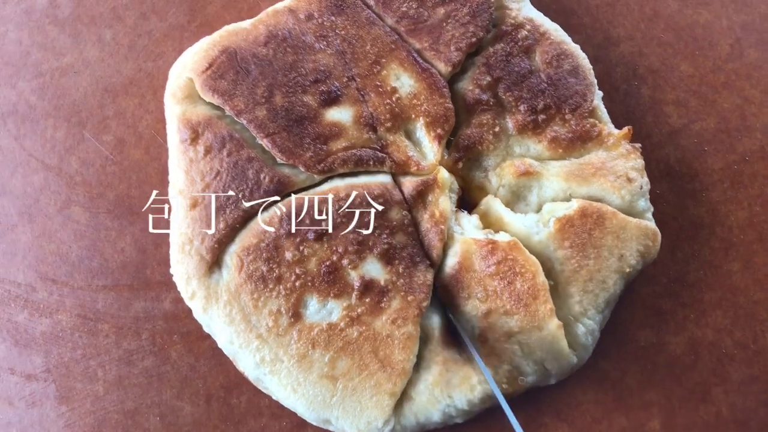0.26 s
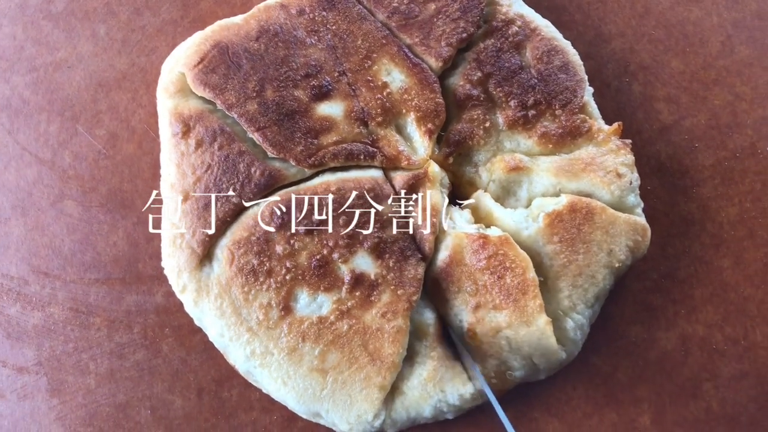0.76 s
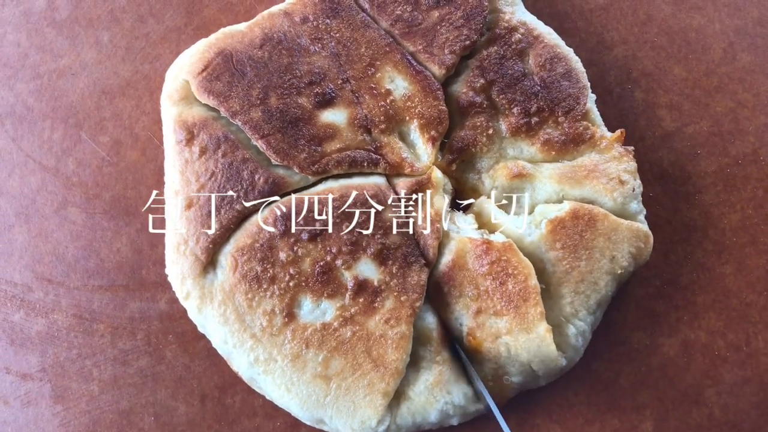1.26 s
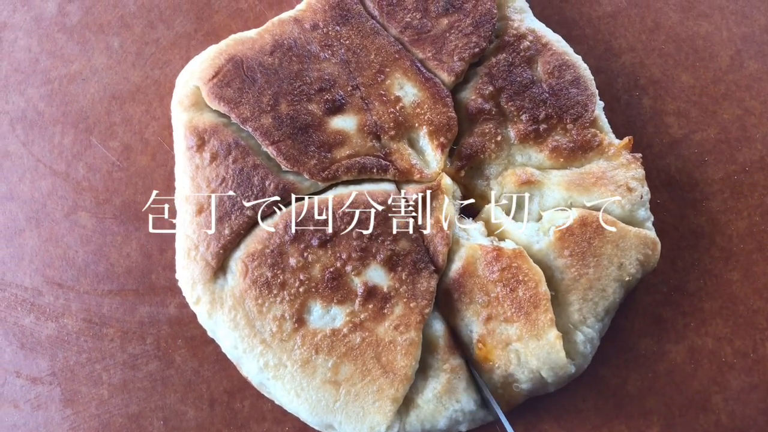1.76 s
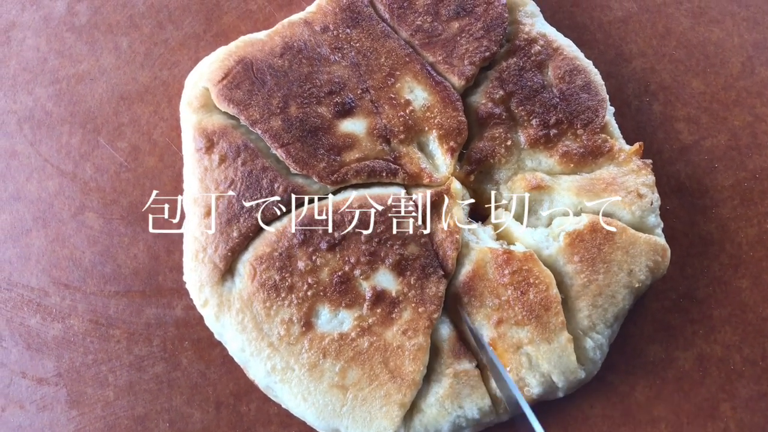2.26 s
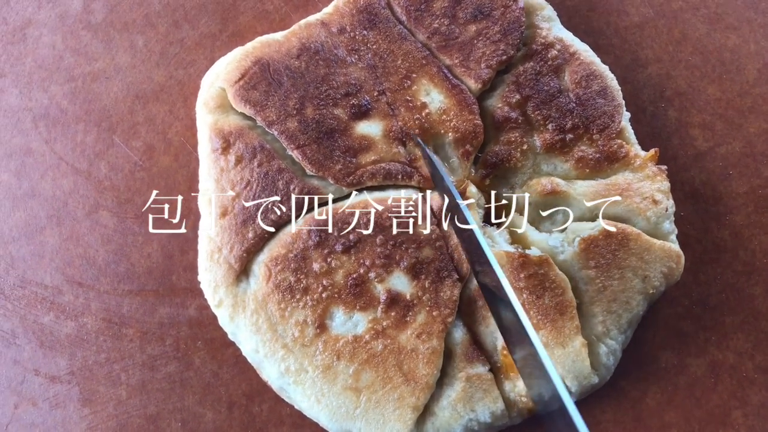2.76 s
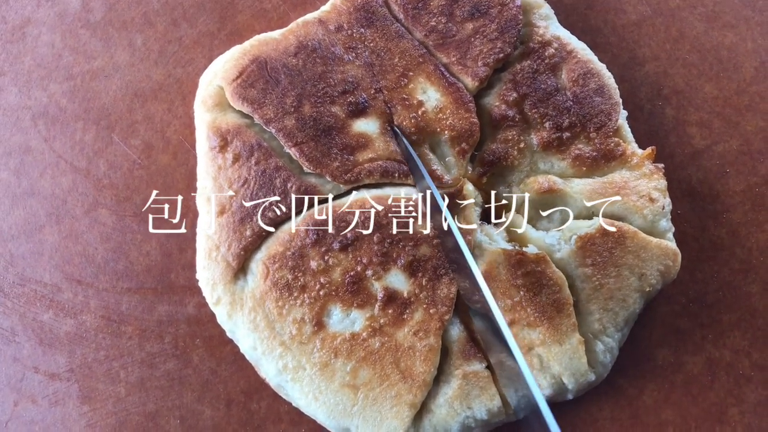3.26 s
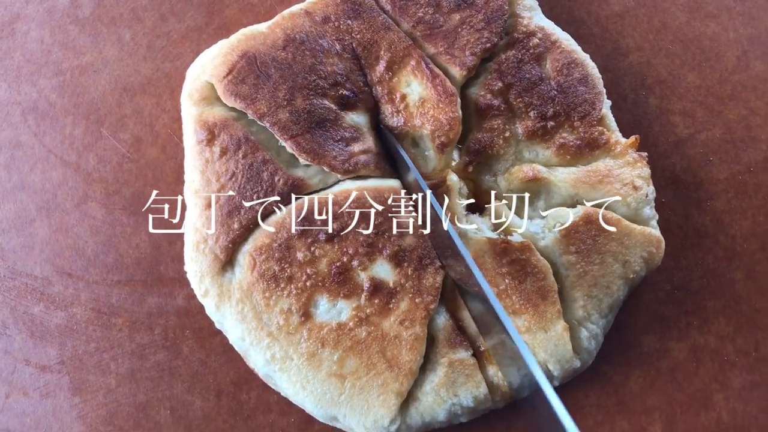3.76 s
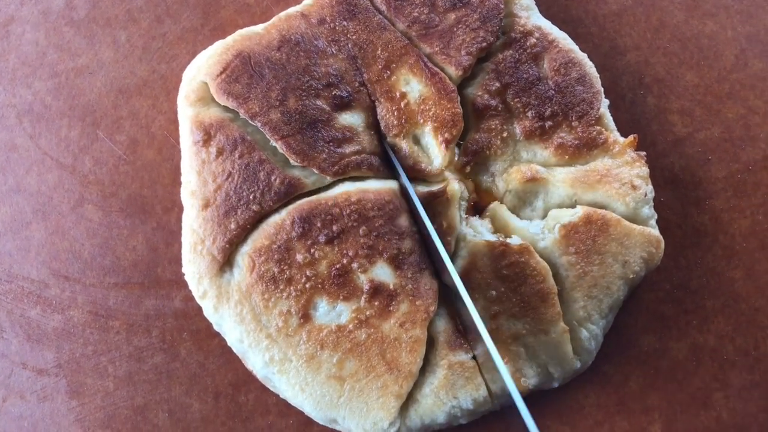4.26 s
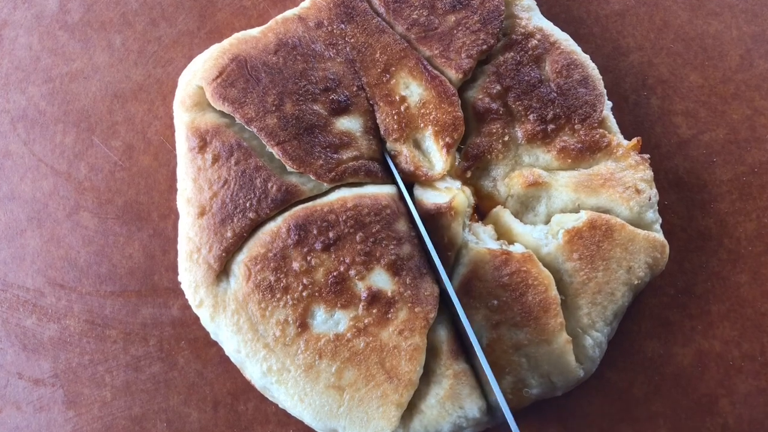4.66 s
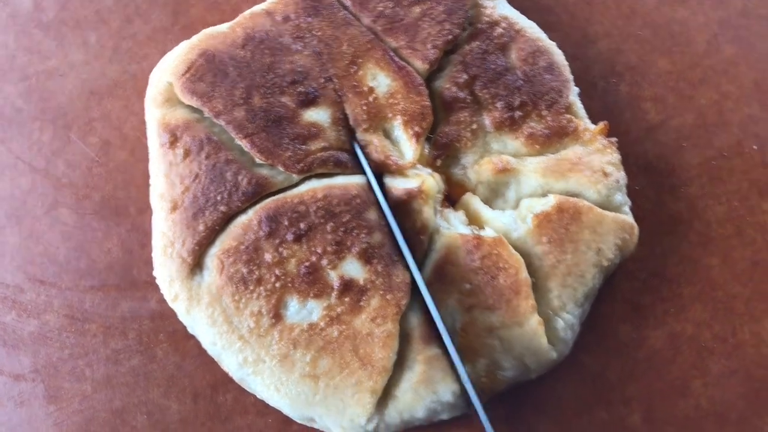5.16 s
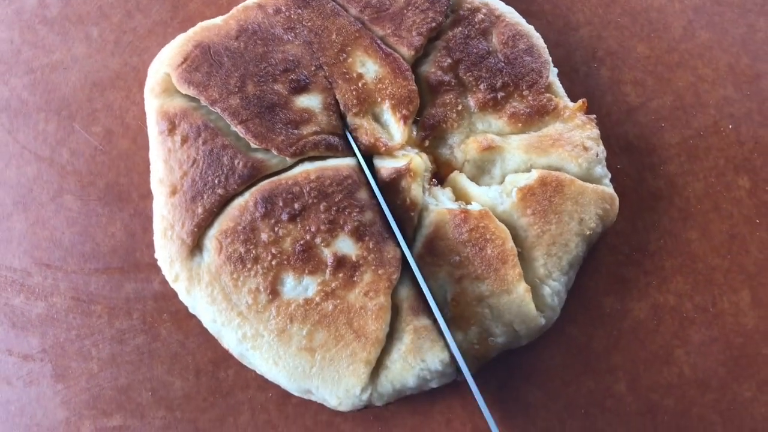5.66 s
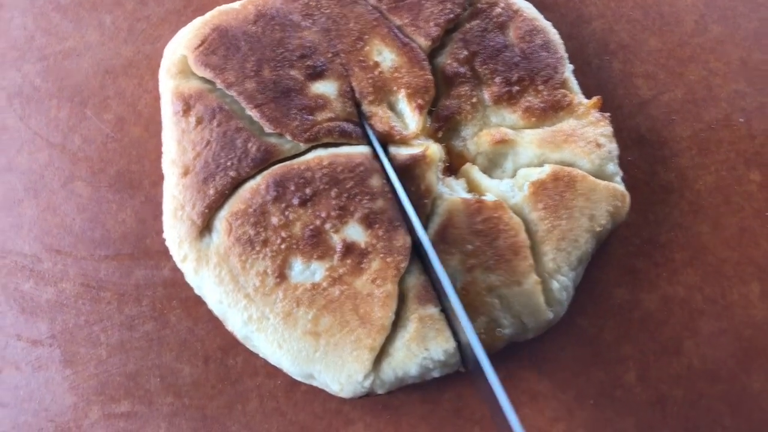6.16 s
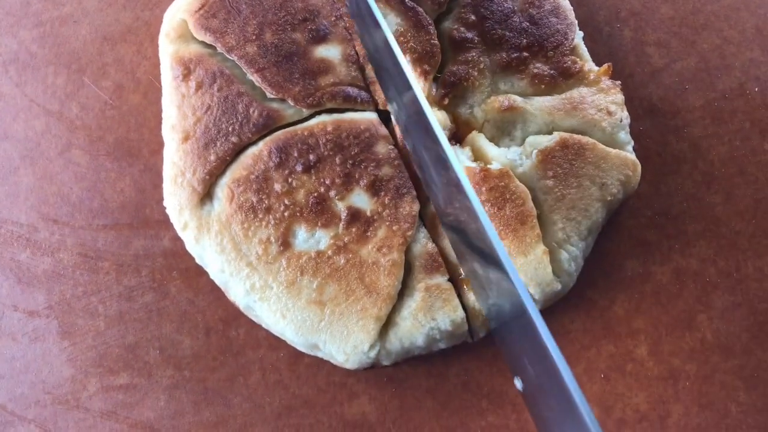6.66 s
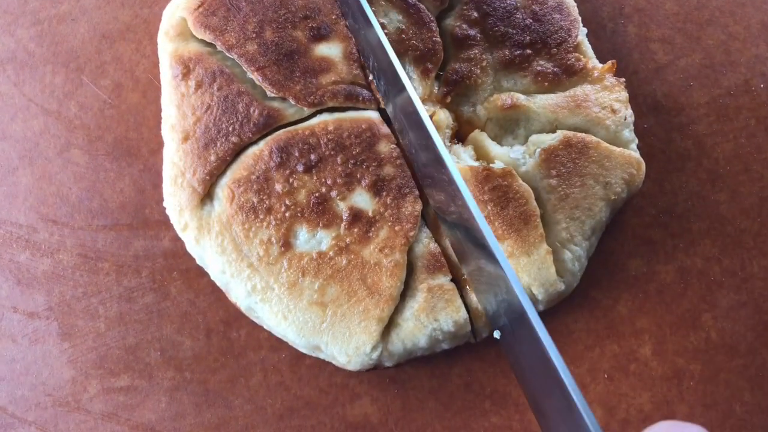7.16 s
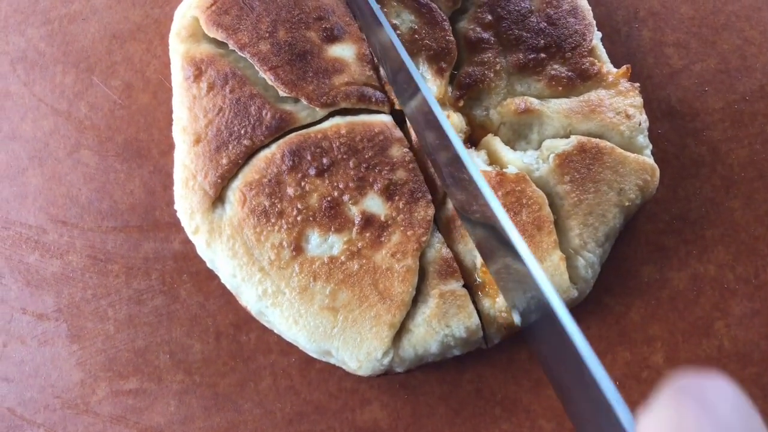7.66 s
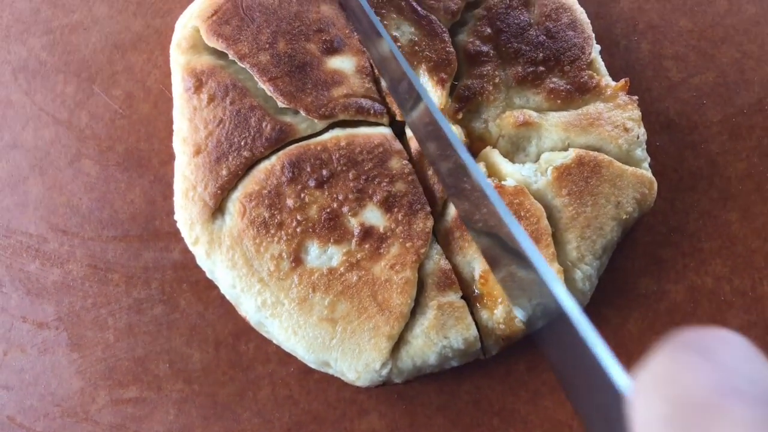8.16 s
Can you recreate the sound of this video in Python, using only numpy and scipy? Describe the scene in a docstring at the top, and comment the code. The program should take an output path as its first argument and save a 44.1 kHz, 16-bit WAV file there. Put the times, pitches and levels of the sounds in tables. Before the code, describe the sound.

A knife cuts crusty pan-fried bread on a cutting board, heard close in a quiet kitchen with a faint low rumble and appliance hum throughout. From the start to about 1.7 seconds, soft rasping strokes saw back and forth about three times a second, growing duller and quieter. Tiny moist ticks from the filling dot the first two seconds. Light, separate scrapes follow until 3.5 seconds. From 3.6 to 6 seconds the blade presses down and the crust crumbles and snaps in brittle, irregular clusters. Around 5 seconds there is a dull thud on the board and a very faint steel squeak. At 5.5 seconds the edge hits the board with one sharp knock, by far the loudest sound. A few small cracks and faint scrapes follow, then longer drags near 7.3 seconds lead into gentle, quick sawing until about 8.4 seconds.

```python
"""In a quiet kitchen, close by, a knife saws through crusty pan-fried bread on a cutting board.
Short strokes finish one cut, rasping as the edge slips over tiny snags, and the moist filling ticks.
The blade is set down again and pressed: the crust crumbles and cracks by brittle fracture, and the
steel squeaks faintly. The edge thuds, then knocks, exciting the modes of the board, and the sawing
resumes. Under it all lie a low rumble and the drone of an appliance."""
import sys
import numpy as np
from scipy import signal
from scipy.fft import rfft, irfft
from scipy.io import wavfile

SR = 44100
rng = np.random.default_rng(int(sys.argv[2]) if len(sys.argv) > 2 else 0)


def wav_record(signal):
    """Record a signal, one row per channel, as 16-bit PCM in the file named by sys.argv[1]."""
    frames = np.transpose(np.atleast_2d(signal))
    bounded = np.clip(frames, -1, 1)
    # unit amplitude maps onto the largest positive 16-bit level
    quanta = np.round(bounded * 32767).astype(np.int16)
    wavfile.write(sys.argv[1], SR, quanta)


N = 371763
TIME, HZ = np.arange(N) / SR, np.fft.rfftfreq(N, 1 / SR)
TAPS = 4096  # samples in one short pulse
TAP_TIME, TAP_HZ = np.arange(TAPS) / SR, np.fft.rfftfreq(TAPS, 1 / SR)


def amp(db):
    """Decibels as an amplitude ratio."""
    return 10 ** (np.asarray(db) / 20)


def unit_rms(x):
    """Normalisation to an rms of 1."""
    return x / np.sqrt(np.mean(x ** 2) + 1e-20)


def curve_at(points, hz):
    """Interpolation on a logarithmic frequency axis."""
    f, value = np.transpose(points)
    return np.interp(np.log(hz + 1), np.log(f + 1), value)


def add(mix, start_s, sound):
    """Superposition of a sound on a mix, in place."""
    part = mix[max(round(start_s * SR), 0):][:len(sound)]
    part += sound[:len(part)]


def noise(gain, count=N):
    """White noise filtered by a gain at each frequency, at an rms of 1."""
    return unit_rms(irfft(rfft(rng.standard_normal(count)) * gain, count))


def drift(count, hz):
    """Slow random fluctuation: noise low-passed at hz."""
    return noise(1 / (1 + (np.fft.rfftfreq(count, 1 / SR) / hz) ** 4), count)


def lift(resonances):
    """Resonance: each row adds a bell-shaped peak, in dB, to a spectrum."""
    return sum(db / (1 + (2 * (TAP_HZ - hz) / width) ** 2) for hz, width, db in resonances)


def pulse(db, bass_delay_s=0, bend_hz=70):
    """A causal pulse of given spectrum; dispersion of bending waves in the board can delay its bass."""
    log_gain = np.log(amp(np.maximum(db, db.max() - 100)))
    mirrored = np.r_[log_gain, log_gain[-2:0:-1]]
    minimum_phase = np.conj(signal.hilbert(mirrored))[:len(db)]
    lag = 2 * np.pi * bass_delay_s * bend_hz * np.log(1 + TAP_HZ / bend_hz)
    return irfft(np.exp(minimum_phase - 1j * lag))


def grains(count, per_s, spread_db):
    """Shot noise: impulses at random times, mostly small and a few large."""
    chance, size, sign = rng.random((count, 3)).T
    size_db = spread_db * np.minimum(-np.log(1 - size), 4)
    return unit_rms((chance < per_s / SR) * amp(size_db) * np.sign(sign - .5))


# The room's noise spectrum. Each row: frequency in Hz, relative density in dB.
ROOM_NOISE = [(13, -47.5), (22, -20), (70, -3.5), (106, -11.5), (155, -5.5), (228, -8.5), (262, -3),
              (300, -13), (335, -11), (407, -15), (467, -15.5), (1040, -22), (1220, -26), (2640, -29.5),
              (15800, -30.5)]
# The drone of an appliance. Each row: centre in Hz, bandwidth in Hz, level in dB.
DRONE_BANDS = [(67, 45, -78), (250, 11, -80), (330.7, 6.6, -83.5)]


def background(air_db=-66.5):
    """Broadband noise gives rumble and hiss; narrowband noise beats within itself as a wavering drone."""
    air = amp(air_db) * noise(amp(curve_at(ROOM_NOISE, HZ)))
    drone = sum(amp(db) * noise(1 / (1 + (2 * (HZ - hz) / width) ** 2)) for hz, width, db in DRONE_BANDS)
    return air + drone


# Bouts of sawing. Each row: start and end in seconds, period in seconds, share of it spent pushing,
# first level in dB, fade in dB per second, pull relative to push in dB, first tilt in dB per octave.
BOUTS = [(-0.008, 1.66, .296, .44, -54.5, -8, -6.5, .5), (7.654, 8.45, .25, .48, -60, -2, -1.5, 0.6)]


def strokes(turn_s=0.024, pull_tilt=1.1, tilt_per_s=-1.85):
    """Reciprocating motion: push, rest, brighter pull, rest; both strokes dull as the blade sinks."""
    rows = []
    for first, last, period, push_share, first_db, fade, pull_db, first_tilt in BOUTS:
        push_s = period * push_share
        for start in np.arange(first, last, period):
            db = first_db + fade * (start - first)
            tilt = first_tilt + tilt_per_s * (start - first)
            rows.append((start, push_s - turn_s, db, tilt))
            rows.append((start + push_s, period - push_s - turn_s, db + pull_db, tilt + pull_tilt))
    return rows


# Single drags as the blade is freed, set down or started.
# Each row: start in seconds, length in seconds, level in dB, tilt in dB per octave.
DRAGS = [(1.76, 0.051, -65.5, -2.5), (1.867, 0.041, -67, -3.5), (1.999, 0.053, -73, 1),
         (2.112, 0.019, -59.5, 3), (2.181, 0.037, -70.5, 0.5), (2.701, 0.056, -61.5, 0.8),
         (2.771, 0.066, -63, 1.5), (2.945, 0.019, -67, 3), (3.101, 0.011, -58, 0.5),
         (3.193, 0.34, -75.5, -1.5), (5.398, 0.083, -50, -0.2), (6.241, 0.05, -69.5, -2),
         (6.821, 0.025, -69, 1.1), (7.07, .01, -59.5, 6.5), (7.165, 0.045, -68, 1.3),
         (7.304, 0.17, -62.5, 1.5), (7.505, 0.11, -58.5, 2.5)]
# The rasp in dough, and on crust and board. Each row: frequency in Hz, relative density in dB.
RASP_IN_DOUGH = [(110, -41), (180, -5), (322, 0.5), (564, -11), (971, 0), (1330, -7.5), (1670, -4.5),
                 (2010, -8.5), (2720, -10.5), (3220, -6.5), (4340, -10), (5330, -7), (8360, -12),
                 (14400, -13), (15800, -14.5)]
RASP_ON_CRUST = [(150, -23.5), (250, -10), (342, -1), (546, -5.5), (857, -0.5), (2000, -3.5), (4000, -8),
                 (9000, -13.5), (15800, -13.5)]
# Resonances of the free steel. Each row: frequency in Hz, bandwidth in Hz, lift in dB.
BLADE_MODES = [(1530, 76, 1), (2820, 170, 3.5), (3780, 170, 2.5), (5070, 500, 1.5), (6040, 200, 2.5),
               (7664, 220, 4), (12000, 350, 4), (13170, 400, 4), (14460, 250, 2.5), (15550, 250, 3.5)]
# The steel rings less once dough grips it. Each row: time in seconds, factor on the lift of its modes.
BLADE_FREEDOM = [(2.8, 1.8), (7.3, 1.15)]


def sawing(new_cut_s=2.5, rise_share=0.2, fall_share=0.29, flutter_db=2.14, gain_db=1):
    """Sliding friction: the edge slips over countless snags, and the rasp swells with its speed."""
    out = np.zeros(N)
    for start, length, db, tilt in strokes() + list(DRAGS):
        t = np.arange(0, length, 1 / SR)
        if start < new_cut_s:
            colour = curve_at(RASP_IN_DOUGH, TAP_HZ)
        else:
            freedom = np.interp(start, *np.transpose(BLADE_FREEDOM))
            colour = curve_at(RASP_ON_CRUST, TAP_HZ) + freedom * lift(BLADE_MODES)
        colour += tilt * np.log2(np.clip(TAP_HZ, 900, 12000))
        snags = grains(len(t), per_s=16000, spread_db=2.5)
        rasp = unit_rms(signal.fftconvolve(snags, pulse(colour))[:len(t)])
        speed = np.minimum(t / (rise_share * length), 1)
        speed *= np.minimum((length - t) / (fall_share * length), 1)
        gain = amp(db + gain_db + flutter_db * drift(len(t), hz=70))
        add(out, start, gain * rasp * speed / speed.max())
    return out


# Moist dough letting go of the steel. Each row: start in seconds, envelope peak in dB, pitch in Hz.
TICKS = [(0.2841, -40.5, 5900), (0.8674, -44, 12700), (0.9884, -37.5, 12200), (1.418, -38, 11900),
         (1.4455, -41.5, 6900), (1.4997, -46, 7100), (1.5227, -40.5, 7800), (1.5796, -40, 12400),
         (1.7522, -40.5, 10600), (1.8024, -41, 7020), (1.8568, -40.5, 10800), (2.0033, -40, 6640),
         (2.1071, -36.5, 6500), (2.1211, -38.5, 3930), (2.1268, -47, 9900), (3.4204, -43, 14600),
         (4.5114, -41.5, 4800)]


def ticking(decay_cycles=1.03, second_db=-13, second_s=0.0079):
    """Film rupture: a wet film bursts and rings briefly, then the rest of it lets go more weakly."""
    out = np.zeros(N)
    for start, db, hz in TICKS:
        age = TAP_TIME * hz / decay_cycles
        envelope = 2 * age * np.exp(1 - 2 * age)
        tick = amp(db) * envelope * np.sin(2 * np.pi * hz * TAP_TIME)
        add(out, start, tick)
        add(out, start + second_s * rng.uniform(0.55, 1.4), amp(second_db) * tick)
    return out


# Waves returning from the rim of the board. Each row: delay in seconds, gain in dB.
RIM_ECHOES = [(.0034, -15), (0.0119, -12.5)]
# Modes of board and blade. Each row: frequency in Hz, dB over the direct blow, 60 dB decay in seconds.
BOARD_MODES = [(136, 3, 0.13), (298, 7, 0.2), (458, -1.5, .2), (630, 0.5, 0.37), (866, -5, .2),
               (1035, 3, 0.066), (1190, -3, 0.26), (1336, -10, 0.19), (1572, -6.5, .17), (1780, -5.5, .2),
               (2429, 0.5, 0.16), (2650, -0.5, 0.2), (3190, 2, 0.25)]
# Broad resonances of a blow on wood. Each row: frequency in Hz, bandwidth in Hz, lift in dB.
WOOD_RESONANCES = [(248, 140, 2), (1420, 270, 7.5), (2885, 1000, 5)]
# The edge meets the board. Each row: start in seconds, peak of the direct blow in dB,
# treble corner in Hz (higher is harder), bass corner in Hz (higher is lighter).
KNOCKS = [(1.218, -57, 1000, 600), (1.236, -46, 850, 250), (1.25, -49.5, 610, 70), (3.738, -52.5, 160, 70),
          (3.872, -52.5, 161, 70), (4.7307, -45.5, 1300, 250), (4.972, -32.5, 1110, 1400),
          (4.9745, -30, 195, 70), (5.121, -50, 200, 90), (5.4789, -11, 1670, 94.7), (5.952, -49, 600, 100),
          (7.072, -55, 790, 1200), (8.201, -48, 1000, 150)]


def knocking(rolloff_order=2.32, click_db=-29):
    """Impact: a blow disperses into a falling chirp, echoes and excites modes; soft ones lack treble."""
    out, t = np.zeros(N), np.arange(SR // 2) / SR
    board = np.zeros(len(t))
    for delay, echo_db in [(0, 0), *RIM_ECHOES]:
        add(board, delay, amp([echo_db]))
    for hz, mode_db, t60 in BOARD_MODES:
        damping = np.log(1000) / t60
        board += amp(mode_db) * 2 * damping / SR * np.exp(-damping * t) * np.cos(2 * np.pi * hz * t)
    for start, db, treble_hz, bass_hz in KNOCKS:
        click = amp(click_db) * (treble_hz / 1750) ** 2
        force = 1 / np.sqrt(1 + (TAP_HZ / treble_hz) ** (2 * rolloff_order)) + click
        radiated = force * (TAP_HZ + 1) / np.hypot(TAP_HZ, bass_hz)
        radiated *= (TAP_HZ + 1) / np.hypot(TAP_HZ, 50)  # the board is too small to radiate deep bass
        blow = pulse(20 * np.log10(radiated) + lift(WOOD_RESONANCES), bass_delay_s=0.027)
        add(out, start, amp(db) * signal.fftconvolve(blow / abs(blow).max(), board))
    return out


# Shoves on the blade. Each row: start in seconds, end in seconds, level of the crumbling in dB.
SHOVES = [(3.622, 4.112, -68.5), (3.703, 3.788, -56.5), (4.27, 4.34, -66), (4.49, 4.67, -66),
          (4.7, 4.97, -62), (5.096, 5.24, -58.5), (5.314, 5.42, -57), (5.5, 5.593, -48.5),
          (5.843, 5.97, -62)]
# The spectrum of crumbs breaking. Each row: frequency in Hz, relative density in dB.
CRUMB_SPECTRUM = [(180, -34), (300, 1), (372, -6), (1250, -2), (1680, -1), (2510, -6), (4950, -3.5),
                  (15800, -9)]


def crumbling(rise_s=0.015, release_s=0.04, flake_hz=2400, flake_width_hz=700, flake_db=8):
    """Microfracture: clumps of snaps follow the pressure; each size of crumb rings at its own pitch."""
    pressure = np.zeros(N)
    for start, end, db in SHOVES:
        rise = np.clip((TIME - start) / rise_s, 0, 1)
        pressure += amp(db) * rise * np.exp(-np.maximum(TIME - end, 0) / release_s)
    clumps = amp(3.5 * drift(N, hz=70))
    crumbs = np.zeros(N)
    for hz in flake_hz * 2 ** np.linspace(-1, 1, 8):
        snaps = grains(N, per_s=110, spread_db=3) * clumps
        flake = lift([(hz, flake_width_hz, flake_db)])
        colour = curve_at(CRUMB_SPECTRUM, TAP_HZ) + lift(BLADE_MODES) + flake
        crumbs += signal.oaconvolve(snaps, pulse(colour, bass_delay_s=0.01823))[:N]
    return pressure * unit_rms(crumbs)


# The loudest fractures. Each row: start in seconds, level in dB, brittleness as extra treble in dB.
CRACKS = [(3.6533, -48.5, 6.5), (3.7129, -44, 4), (3.7183, -41, -2), (3.7243, -41.5, -3), (3.743, -45.5, 2),
          (3.7604, -46, -4), (3.7954, -43.5, -4), (3.835, -44, 6), (3.8583, -47.5, 10), (3.8707, -46, -10),
          (3.9137, -38.5, 5), (4.2523, -55.5, 6), (4.291, -54, 2), (4.313, -51.5, -24), (4.335, -49.5, 5),
          (4.356, -43.5, 2), (4.3867, -52, 0), (4.5646, -55.5, 3), (4.6052, -56.5, -1), (4.6973, -55, 1),
          (4.732, -46.5, -11), (4.76, -53, 0), (4.86, -52, 5), (4.9685, -43.5, -6.5), (5.1194, -41.5, -1.5),
          (5.1456, -44.5, -2), (5.161, -44.5, -0.5), (5.1749, -38.5, -3), (5.2181, -39.5, 6),
          (5.2349, -44, -11.5), (5.2627, -47.5, 5.5), (5.3288, -34.5, 1), (5.3863, -46, 6.5),
          (5.4755, -33, -4.5), (5.532, -36, 1.5), (5.6016, -55, -18), (5.716, -47.5, -0.5),
          (5.8628, -53, -4), (5.9156, -51, 4), (5.939, -40.5, -1), (5.9519, -47, -1)]


def cracking(top_until_s=5, base_from_s=5.15, splinter_s=0.0028, flake_width_hz=600, flake_db=7):
    """Brittle fracture: the thin top crust snaps cleanly, the thick base splinters; each flake rings."""
    out = np.zeros(N)
    crossing = (top_until_s, base_from_s)  # the pairs below are (top crust, base)
    for start, db, brittle_db in CRACKS:
        body_db = np.interp(start, crossing, (3.5, -3.5))
        treble_db = np.interp(start, crossing, (-4, -8)) + brittle_db
        splinter_share = np.interp(start, crossing, (0.29, 0.94))
        flake_hz = np.interp(start, crossing, (2560, 4165)) * 2 ** rng.uniform(-0.6, 0.6)
        spectrum = [(60, body_db - 17), (200, body_db - 1.5), (450, body_db - 6.5), (1000, body_db - 4),
                    (1600, -0.5), (2700, -5), (4400, -5), (6500, treble_db), (15000, treble_db - 2.5)]
        flake = lift([(flake_hz, flake_width_hz, flake_db)])
        colour = curve_at(spectrum, TAP_HZ) + 0.44 * lift(BLADE_MODES) + flake
        spray = grains(TAPS, per_s=6400, spread_db=4.5) * np.exp(-TAP_TIME / splinter_s)
        spray *= np.sqrt(splinter_share) / np.linalg.norm(spray)
        spray[0] += np.sqrt(1 - splinter_share)  # the first break takes the remaining energy
        crack = signal.fftconvolve(spray, pulse(colour, bass_delay_s=0.018))
        crack *= np.sqrt(0.0044 * SR) / np.linalg.norm(crack)  # the energy of 4.4 ms at an rms of 1
        add(out, start, amp(db) * crack)
    return out


# The squeak of the sinking blade. Each row: time in seconds, level in dB.
SQUEAK_LEVELS = [(4.88, -98), (4.94, -72), (5.02, -84), (5.06, -71), (5.11, -74)]


def squeaking(mode_hz=2230, waver=0.0047, flutter_db=2):
    """Friction-induced vibration: rubbing keeps one mode of the blade singing faintly."""
    times, db = np.transpose(SQUEAK_LEVELS)
    envelope = np.interp(TIME, times, amp(db), left=0, right=0)
    cycles = np.cumsum(mode_hz * (1 + waver * drift(N, hz=60))) / SR
    flutter = amp(flutter_db * drift(N, hz=40))
    return envelope * flutter * unit_rms(np.sin(2 * np.pi * cycles))


# The kitchen's reverberation time. Each row: frequency in Hz, 60 dB decay in seconds.
KITCHEN_T60 = [(100, .3), (400, 0.27), (1500, 0.16), (5000, 0.13), (15000, 0.23)]


def kitchen(sound, gap_s=0.0063, dull_hz=9000):
    """Reverberation: dense, slightly dull reflections follow a gap, each band dying at its own rate."""
    t = np.arange(SR // 2) / SR
    reflections = grains(len(t), per_s=4000, spread_db=2) * (t > gap_s)
    hz, age, bands = signal.stft(reflections, SR, nperseg=256)
    decay = amp(-60 * age / curve_at(KITCHEN_T60, hz)[:, None])
    lowpass = 1 / np.hypot(1, hz / dull_hz)[:, None]
    tail = signal.istft(bands * decay * lowpass, SR, nperseg=256)[1]
    return signal.oaconvolve(sound, tail / np.linalg.norm(tail))[:N]


def scene(bread_room_db=-11, board_room_db=-12):
    """Superposition: the direct sound of knife, bread and board, its reverberation and the background."""
    bread = sawing() + ticking() + crumbling() + cracking() + squeaking()
    board = knocking()
    room = kitchen(amp(bread_room_db) * bread + amp(board_room_db) * board)
    return (background() + bread + board + room)[None]


def record(dry, cutoff_hz=15900):
    """Band limiting: a steep low-pass filter removes the highest treble."""
    lowpass = signal.firwin(301, cutoff_hz, window=("kaiser", 8), fs=SR)
    return signal.oaconvolve(dry, lowpass[None], "same")


dry = scene()
out = record(dry)
wav_record(out)
```